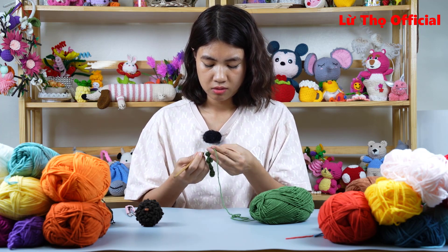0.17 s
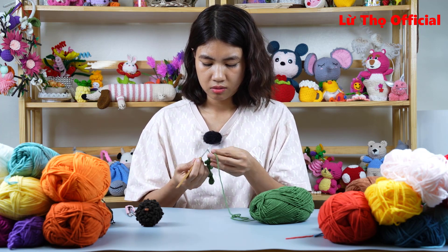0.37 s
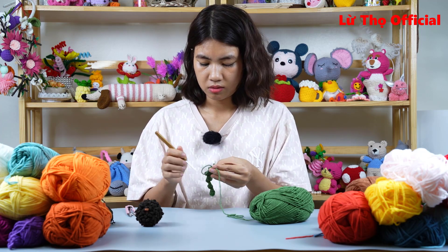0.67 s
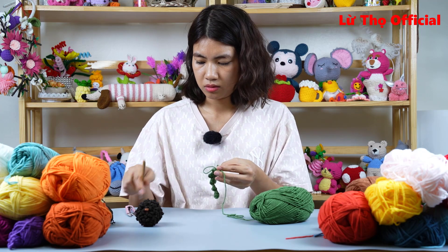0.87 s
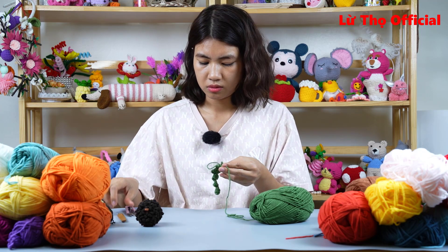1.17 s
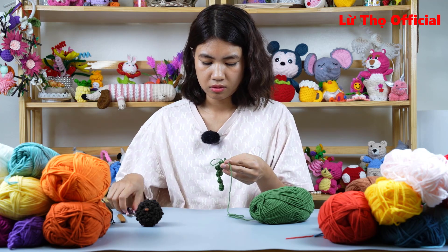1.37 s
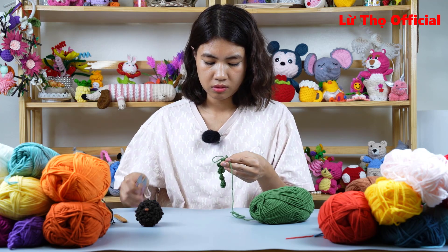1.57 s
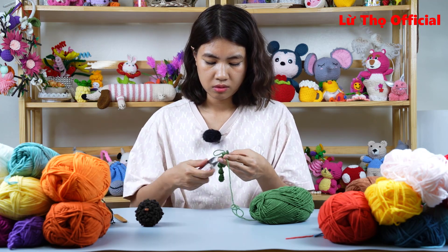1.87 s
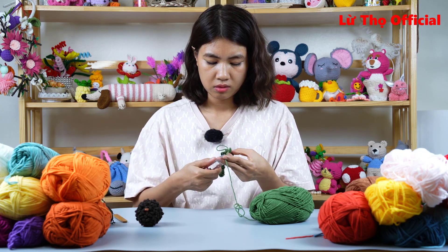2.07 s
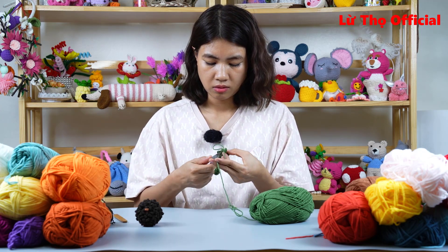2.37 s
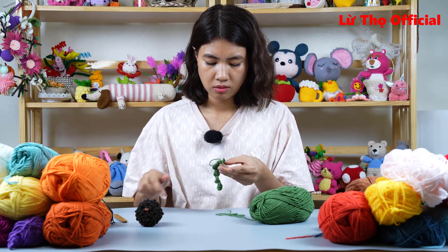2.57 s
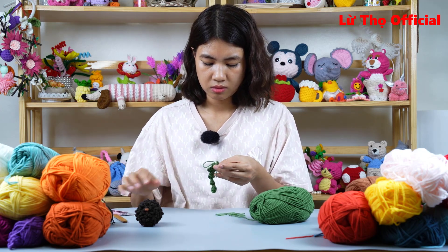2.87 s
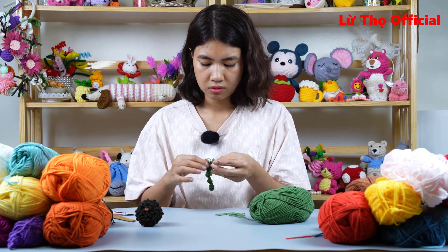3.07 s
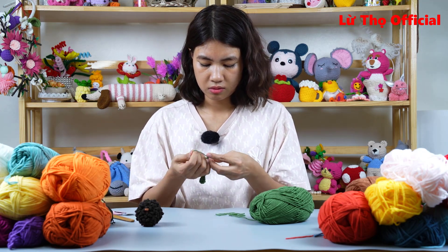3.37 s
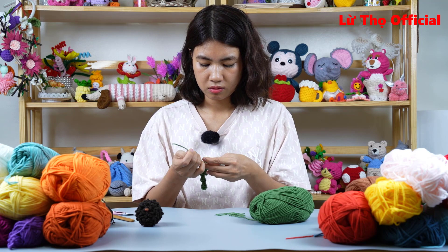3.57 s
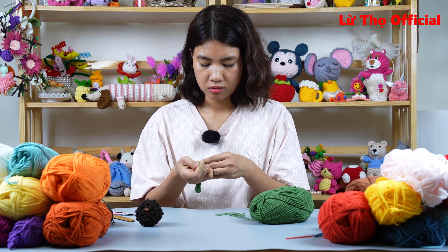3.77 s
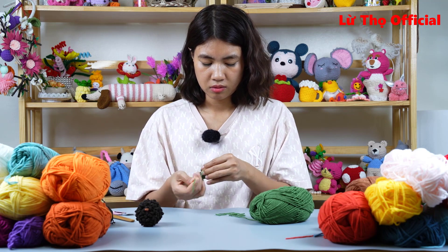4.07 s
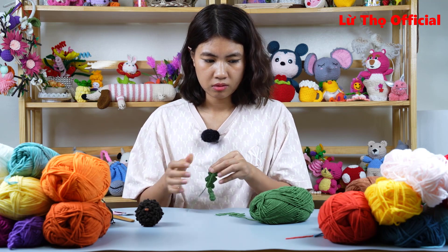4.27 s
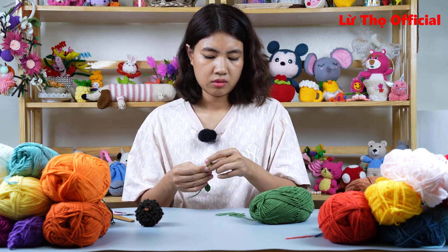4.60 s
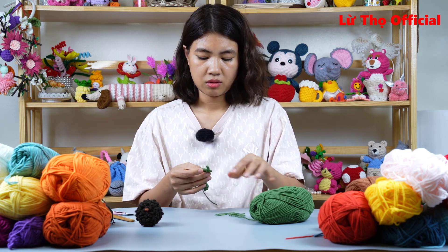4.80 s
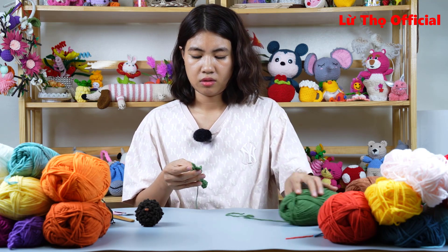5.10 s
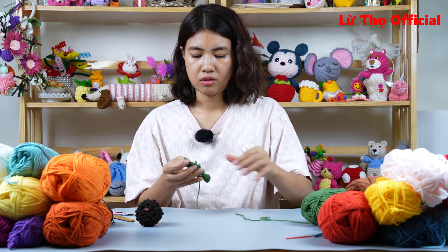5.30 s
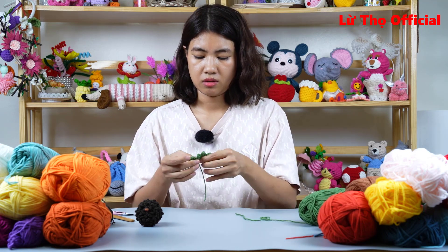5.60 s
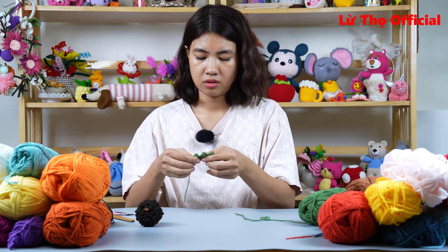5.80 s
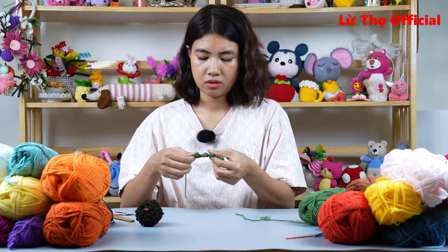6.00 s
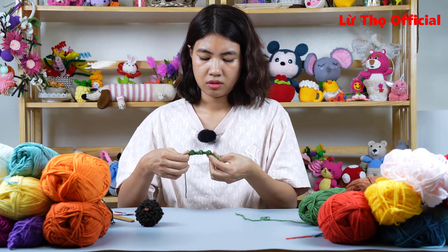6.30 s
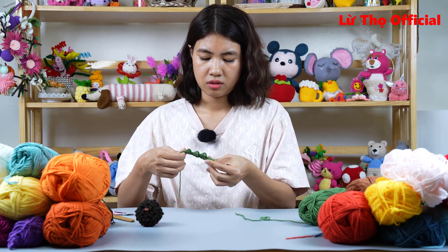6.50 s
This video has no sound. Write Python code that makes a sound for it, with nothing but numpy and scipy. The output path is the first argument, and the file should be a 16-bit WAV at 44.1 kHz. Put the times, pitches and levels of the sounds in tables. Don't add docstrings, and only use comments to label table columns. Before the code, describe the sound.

In a small quiet room, yarn slips with a faint squeak over a metal hook, which then drops on the table with a sharp knock and a rolling rattle. Scissors drag up, scrape open, snip hard, snip again more finely, and clatter down on the wood. Afterwards fingers rub and tug yarn in soft, fuzzy strokes. A close chest microphone adds low room rumble and light hiss.

```python
import sys
import numpy as np
from scipy import signal
from scipy.fft import rfft, irfft
from scipy.io import wavfile
from scipy.ndimage import uniform_filter1d

SR = 44100
rng = np.random.default_rng(int(sys.argv[2]) if len(sys.argv) > 2 else 0)


def master(y):
    cut = np.clip(np.atleast_2d(y).T, -1, 1)
    pcm = np.round(cut * 32767)
    wavfile.write(sys.argv[1], SR, pcm.astype(np.int16))


def voltage_ratio(decibels):
    exponent = np.asarray(decibels, float) / 20
    return 10 ** exponent


N = 293176

# pitch_hz, level_db, t60_s
END_MODES = [(1810, -13, 0.041), (4061, 3, 0.0355), (4220, 0, 0.03), (7630, 0.5, 0.014), (10700, -13, 0.01)]
SIDE_MODES = [(2640, -6.5, 0.0073), (4960, -18, .06), (4990, -2, 0.014), (7600, -22, .04),
              (7850, -3.5, 0.011), (10960, -21, 0.0053)]
LYING_MODES = [(1720, -9, 0.074), (4070, 7.5, 0.034), (7600, 0, .05), (10700, -13, 0.04), (13100, -14, .03)]
# start_s, peak_db, contact_hz, chatter_t60_s, body_ring_db
HOOK_LANDINGS = [
    (1.1415, -32.5, 5400, 0.0055, -20),
    (1.154, -2.5, 3900, 0.0025, -5),
    (1.1543, -11.5, 6000, .005, -32),
    (1.1545, -10, 2650, 0.0058, -28),
    (1.1635, -20, 4500, .003, -32),
]
HOOK_ROLLING = [(1.2222, -4.5, 7350, 0.004, -10), (1.2224, -6.5, 2800, .005, -18),
                (1.228, -16, 3200, 0.014, -19), (1.2226, -12, 5400, .004, -25),
                (1.2355, -6, 3400, 0.0036, -29), (1.2357, -11, 5600, .003, -30),
                (1.2435, -7, 3980, 0.0047, -20), (1.251, -4, 8100, 0.0034, 7.5),
                (1.2512, -7, 3100, .005, -20), (1.274, -26.5, 12000, .003, -22),
                (1.282, -11, 4670, 0.0033, -35), (1.298, -25, 11000, 0.0033, -13),
                (1.171, -29.5, 7500, .003, -20), (1.2135, -20, 2500, .003, -25),
                (1.302, -19, 3000, .003, -25)]
HOOK_TOUCHES = [
    (1.094, -37, 7600, 0.0052, -16),
    (3.002, -7.5, 9500, 0.0049, -8.5),
    (3.0022, -11, 5460, 0.0035, -30),
    (3.137, -17, 9600, 0.01, -4),
    (3.165, -28, 11000, 0.0077, -18),
]


def hook():
    landing = knocks(HOOK_LANDINGS, END_MODES, loose=0.0041, thud_db=2.1, crack_db=-8.0)
    rolling = knocks(HOOK_ROLLING, SIDE_MODES, loose=0.0013, thud_db=-6.5, crack_db=-18.5)
    nudged = knocks(HOOK_TOUCHES, LYING_MODES, loose=0.0044, thud_db=-25, crack_db=-8.0)
    return off_axis(landing + rolling + nudged)


# pitch_hz, level_db, t60_s
HANDLE_MODES = [(1700, 0, .02), (2080, -3, .014), (2500, -3, .012), (2900, 0, .012), (3250, -2, .012),
                (4200, -6, .01), (4550, -7, .008), (5500, -7, .008), (7800, -12, .006)]
# start_s, peak_db, contact_hz, chatter_t60_s, body_ring_db
HANDLES_LIFTED = [(1.422, -24, 1900, 0.004, 8), (1.4222, -26, 4970, .003, -10),
                  (1.429, -28, 4550, 0.0091, 5), (1.441, -21.5, 5560, 0.0034, -12),
                  (1.4412, -25, 3150, 0.0074, 3), (1.489, -32, 6040, .0044, -3),
                  (1.524, -12, 4500, 0.0044, -0.5), (1.5445, -7, 8260, 0.0034, -6),
                  (1.545, -8.5, 5240, 0.0099, -6), (1.5452, -11.5, 3100, .008, -11),
                  (1.574, -37, 10500, .003, -14), (1.608, -23, 1900, 0.0082, -3.5)]
HANDLES_LAID = [(2.856, -13, 2370, 0.0088, 5), (2.868, -25, 2220, .0043, 10.5),
                (2.881, 0, 3480, 0.006, -5.5), (2.8835, -5, 3000, 0.0053, -16),
                (2.893, -10, 2550, 0.0039, -1), (2.909, -23, 6000, .004, 10), (2.923, -30, 7000, .004, -6),
                (2.946, -18, 5030, 0.0035, 3), (2.955, -13.5, 2880, 0.012, 4),
                (2.9575, -10, 2900, 0.0042, -9.5), (2.9595, -7.5, 2860, 0.0085, -5),
                (2.976, -21, 2800, 0.0053, 6), (3.012, -17, 2120, 0.0029, 5),
                (2.8812, -7.5, 6170, 0.0074, -25), (3.061, -20, 3000, 0.0036, 0.5),
                (3.077, -20, 3170, .003, -3)]
FAINT_TICKS = [
    (.433, -31, 4900, .003, -25),
    (.658, -36, 2000, .0024, -20),
    (.669, -25, 5430, .003, -25),
    (2.794, -30, 3800, .004, -20),
    (4.597, -38, 800, .004, -20),
    (4.785, -38, 6000, .003, -20),
    (6.219, -34, 1300, .005, -22),
    (6.2195, -38, 6500, .003, -30),
]


def handles():
    lifted = knocks(HANDLES_LIFTED, HANDLE_MODES, loose=0.033, thud_db=-21.5, favour_db=12.0, crack_db=-12.0)
    laid = knocks(HANDLES_LAID, HANDLE_MODES, loose=0.021, thud_db=-24, favour_db=9.0, crack_db=-19.0)
    ticks = knocks(FAINT_TICKS, HANDLE_MODES, loose=.08, thud_db=-50.5)
    return off_axis(lifted + laid + ticks)


def off_axis(x):
    return signal.sosfilt(signal.butter(2, 13300, fs=SR, output="sos"), x)


# pitch_hz, level_db
TABLE_COLOUR = [(120, -17), (300, -14), (450, -0.5), (800, -0.5), (1700, 1), (3000, -4.5), (5000, -20.5),
                (9000, -44.5)]
# pitch_hz, level_db, t60_s
TABLE_MODES = [(471, -13, 0.15), (552, 0.5, 0.032), (596, -4, 0.023), (832, 2, 0.047), (1047, 10, 0.092),
               (1545, 8, 0.067), (1930, 1, 0.03), (2160, -3, .023), (2980, 8, .018), (3000, -11, 0.035),
               (3480, -3, 0.032)]
TABLE_T60_S = 0.058


def knocks(rows, body, loose, thud_db, favour_db=0, crack_db=-35.0):
    out, t = np.zeros(N), np.arange(4000) / SR
    for start_s, db, hz, t60, body_db in rows:
        chatter, wood = rng.standard_normal((2, len(t)))
        chatter = chatter * voltage_ratio(-60 * t / max(t60, .001))
        chatter[0] = 1.5
        click = band(band(chatter, 0.64 * hz, 1.33 * hz), 0.54 * hz, 1.62 * hz)
        click = click + voltage_ratio(crack_db + 0.43 * db) * band(chatter, 1400, 12000)
        add(out, start_s, voltage_ratio(db) * click / abs(click).max())

        detune = 1 + loose * rng.uniform(-0.38, 1, (len(body), 1))
        add(out, start_s, voltage_ratio(db + body_db) * ring(favoured(body, hz, favour_db), detune))

        rattle = voltage_ratio(-6 - 60 * t / TABLE_T60_S) * evened(colour(wood, TABLE_COLOUR))
        rattle = rattle * (1 - np.exp(-t / .0004))
        top = ring(TABLE_MODES, rng.uniform(.985, 1.015, (len(TABLE_MODES), 1)))[:len(t)]
        add(out, start_s, voltage_ratio(db + thud_db) * (0.53 * rattle + 0.43 * top))
    return out


# pitch_hz, level_db
BLADE_MODES = [(1600, -28.5), (3250, -14.5), (4350, -11.5), (5500, -7), (6250, -10), (6580, -4.5),
               (6950, -5.5), (8800, -24), (9750, -6), (10100, -4.5), (11450, -3.5), (12300, 4), (13100, 6),
               (14900, 3)]
# peak_s, rise_s, fall_s, level_db, favoured_mode_hz
BLADE_BURSTS = [(2.229, 0.0015, .0017, -52, 5500), (2.241, 0.0016, .002, -50, 6600),
                (2.25, 0.004, 0.0042, -35, 11450), (2.252, .005, 0.0045, -34.5, 6700),
                (2.262, 0.00075, 0.00069, -29, 6600), (2.276, 0.00229, 0.0018, -28, 11450),
                (2.2757, 0.0047, 0.0025, -24.5, 6600), (2.322, .013, .01, -57, 11400),
                (2.32, .012, .012, -54, 6700), (2.349, 0.0091, .004, -39, 6600),
                (2.255, .008, .008, -41, 1600), (2.340, .006, 0.0064, -45, 11400),
                (2.35, 0.0059, 0.0033, -33, 11400), (2.3555, 0.0021, 0.0015, -22.5, 11230),
                (2.358, .001, 0.00075, -11, 6580), (2.3598, .001, 0.0016, -10.5, 10480),
                (2.3597, 0.00081, 0.00081, -20.5, 6560), (2.5092, 0.00086, 0.0024, -31.5, 11150),
                (2.5132, 0.0013, 0.0017, -25, 7100), (2.515, 0.0012, 0.0012, -16, 11400),
                (2.517, 0.00084, 0.00082, -15.5, 9900), (2.5193, 0.00049, .0008, -17, 9800),
                (2.519, 0.0009, 0.0015, -26, 5500), (2.521, 0.0068, 0.0051, -24, 12500),
                (2.522, .004, 0.0036, -28, 5500), (2.516, .003, .003, -32, 7000),
                (2.5251, 0.00038, 0.001, -12, 11400), (2.5247, .0006, 0.0011, -16.5, 6440),
                (2.5263, 0.00061, 0.0012, -15.5, 11400), (2.5295, 0.0006, 0.00078, -16, 7000),
                (2.5293, .0005, 0.00037, -13, 13100), (2.528, .0005, 0.00055, -28, 9500),
                (2.535, 0.0008, 0.0018, -38, 7000)]
# start_s, bending_ring_db, pitch_hz, t60_s, thud_db
BLADE_STOPS = [
    (2.251, -26, 2800, 0.012, -45),
    (2.262, -34, 2660, 0.022, -50),
    (2.2769, -9, 3220, 0.012, -21.5),
    (2.3598, 4, 3090, 0.0073, -11),
    (2.512, -30, 3200, 0.012, -48),
    (2.521, -24, 3150, 0.012, -32),
    (2.529, -26, 3100, 0.044, -32),
    (2.535, -25, 3493, 0.03, -62.5),
]
BLADE_CYCLES = 32


def snips():
    out = np.zeros(N)
    swing_in = 1 - np.exp(-np.arange(SR // 10) / SR / .0005)
    modes = [(hz, own_db, BLADE_CYCLES / hz) for hz, own_db in BLADE_MODES]
    for peak_s, rise, fall, db, near_hz in BLADE_BURSTS:
        t = np.arange(-rise, 2 * fall, 1 / SR)
        swell = np.where(t < 0, (1 + t / rise) ** 2, np.exp(-(t / fall) ** 2 * 2))
        burst = grit(SR // 20, 2.2)[:len(t)] * swell
        detune = rng.uniform(.99, 1.01, (len(modes), 1))
        blades = signal.oaconvolve(burst, ring(favoured(modes, near_hz, 17.5), detune) * swing_in)
        blades /= np.sqrt(np.mean(blades[:len(t)] ** 2))
        scrape = 0.2 * evened(band(burst, 9000, 16400)) + 0.0985 * evened(band(burst, 1610, 5240))
        add(blades, 0, scrape)
        add(out, peak_s - rise, voltage_ratio(db) * blades)
    out = signal.sosfilt(signal.butter(2, 1290, "high", fs=SR, output="sos"), out)

    t = np.arange(2000) / SR
    for start_s, db, hz, t60, thud_db in BLADE_STOPS:
        bend = ring([(hz, 0, t60), (.95 * hz, -4, 1.5 * t60)])[:len(t)] * (1 - np.exp(-t / .0006))
        thud = np.sin(2 * np.pi * 650 * t) * np.exp(-t / 0.001)
        add(out, start_s, voltage_ratio(db) * bend)
        add(out, start_s, voltage_ratio(thud_db) * thud)
    return out


# middle_s, length_s, level_db, resonance_hz, bright_share (0-1)
TABLE_SLIDES = [(1.198, 0.027, -22, 1050, 0.76), (1.199, 0.011, -18, 5700, 0.2),
                (1.496, 0.007, -33, 4080, 0.2), (1.5633, 0.0057, -23, 2770, 0.27),
                (1.564, .006, -33, 3850, .2), (1.514, .014, -32, 3174, 0.1),
                (1.55, 0.0215, -32.5, 3123, 0.1), (1.596, 0.0065, -33, 2900, .4),
                (1.298, 0.26, -30.5, 1110, 0.43), (1.449, 0.04, -32.5, 2050, 0.37),
                (1.497, 0.035, -30.5, 1800, 0.55), (1.524, 0.02, -28.5, 2090, 0.2),
                (1.548, 0.043, -25, 1900, 0.26), (1.61, 0.013, -26, 1830, 0),
                (1.624, 0.0077, -37.5, 1740, 0), (1.633, 0.011, -25, 1680, 0.14),
                (1.618, 0.08, -37, 4770, 0.73), (1.69, 0.072, -54, 1710, 0.3),
                (1.508, 0.048, -36, 5300, 0.45), (2.865, 0.015, -18, 1860, 0.31),
                (2.9, 0.01, -23, 1930, 0.4), (2.961, 0.026, -22, 1780, 0.44),
                (3.017, 0.018, -26, 1780, 0.47)]


def slides():
    out, rough = np.zeros(N), grit(N, 2.4)
    scratch_hz = 4500
    for middle_s, length, db, hz, bright in TABLE_SLIDES:
        start_s, catch, swell = stroke(rough, middle_s, length, 3.7)
        bright = np.clip(bright, 0, 1)
        lower = resonate(resonate(catch, hz, 370), hz, 450)
        upper = resonate(resonate(catch, 1.5 * hz, 410), 1.33 * hz, 540)
        hollow = evened(lower + 900 / hz * upper + 0.263 * band(catch, 5370, 5500))
        scratch = band(catch, 0.43 * scratch_hz, 0.96 * scratch_hz) + 0.99 * band(catch, 450, 3800)
        add(out, start_s, voltage_ratio(db) * swell * (bright * evened(scratch) + (1 - bright) * hollow))
    return out


# pitch_hz, level_db
FUZZ_COLOUR = [(1700, -20), (2400, -4.5), (3200, -1), (10000, -3.5), (13000, -8), (16000, -8)]
# middle_s, length_s, level_db, centre_hz, airy_top_db (re level)
YARN_PULLS = [
    (.004, 0.02, -36.5, 4970, -4.5),
    (0.268, 0.1, -50.5, 5020, -16),
    (0.475, 0.087, -36.5, 4900, -5),
    (0.509, 0.074, -38, 8750, 0),
    (0.531, 0.062, -43, 4000, -15),
    (1.81, 0.031, -53, 5300, -15),
    (1.948, 0.0084, -48, 6300, -17),
    (1.9, 0.37, -58, 5400, -21),
]
YARN_RUBS = [(3.179, 0.042, -40.5, 4500, 1), (3.26, 0.088, -39, 6140, -5), (3.38, 0.083, -44.5, 5000, -9),
             (3.498, 0.081, -36.5, 5260, -6), (3.68, 0.19, -48.5, 6250, -13),
             (3.79, 0.05, -48.5, 5550, -12), (3.98, 0.055, -50.5, 6600, -2), (4.2, 0.054, -41.5, 5420, -5),
             (4.52, 0.099, -49.5, 6000, -9), (4.676, 0.092, -37.5, 5680, -26.5),
             (4.76, 0.063, -46.5, 6470, -1), (5.17, 0.27, -48.5, 5000, -35.5),
             (5.316, 0.048, -40, 6800, -6), (5.49, 0.36, -57, 5300, -7.5), (5.275, 0.029, -53, 4800, -20),
             (5.5, 0.026, -48, 4800, -15), (5.655, 0.061, -47.5, 5800, -16), (5.78, 0.049, -44, 6480, -16),
             (5.85, 0.082, -48.5, 6300, -6), (5.979, 0.11, -41, 6430, -10),
             (6.128, 0.096, -48.5, 5700, -11), (6.299, 0.099, -34, 6470, -12.5),
             (6.364, 0.078, -36.5, 5200, -21.5), (6.585, 0.16, -42.5, 6600, -25),
             (5.7, 1.3, -53.5, 6000, -17)]
# middle_s, length_s, level_db
SOFT_BRUSHES = [
    (.004, 0.014, -39),
    (0.473, 0.083, -36),
    (.53, 0.032, -47),
    (3.484, .05, -41),
    (4.6, 0.4, -53),
    (5.122, 0.13, -41.5),
    (5.298, 0.25, -42.5),
    (6.303, 0.13, -65),
]
# middle_s, length_s, level_db, pitch_hz
HOOK_SQUEAKS = [
    (.004, 0.015, -40, 4750),
    (0.292, 0.12, -57.5, 5000),
    (0.437, 0.015, -41.5, 4900),
    (.452, 0.01, -29.5, 4980),
    (0.472, 0.02, -30.5, 4870),
    (0.536, 0.043, -38, 4930),
    (0.678, 0.0093, -51.5, 4940),
]
RUB_EDGE = 2.86


def yarn():
    out = np.zeros(N)
    fibres = patchy(colour(grit(N, 0.99), FUZZ_COLOUR), 2)
    for middle_s, length, db, hz, top_db in YARN_PULLS + YARN_RUBS:
        start_s, fuzz, swell = stroke(fibres, middle_s, length, RUB_EDGE)
        core = evened(band(fuzz, 1800, 9000) + 5.5 * resonate(fuzz, hz, 2600))
        airy = voltage_ratio(top_db) * evened(band(fuzz, 5800, 17000))
        add(out, start_s, voltage_ratio(db - 4.5) * swell * (core + airy))

    cloth = evened(resonate(resonate(grit(N, 0.72), 1650, 2400), 1350, 2900))
    for middle_s, length, db in SOFT_BRUSHES:
        start_s, brush, swell = stroke(cloth, middle_s, length, RUB_EDGE)
        add(out, start_s, voltage_ratio(db - 10.5) * swell * brush)

    taut = grit(SR, 3.0)
    for middle_s, length, db, hz in HOOK_SQUEAKS:
        start_s, slip, swell = stroke(taut, middle_s, length, RUB_EDGE)
        squeak = evened(resonate(resonate(slip, hz, 450), hz, 630))
        add(out, start_s, voltage_ratio(db - 1.5) * swell * squeak)
    return out


# start_s, level_db, pitch_hz
SOFT_PATS = [(1.6, -42, 360), (3.1, -31, 330), (2.882, -19.5, 123), (3.469, -25, 248), (3.3, -44, 150),
             (2.7, -31, 84), (1.6, -22, 330), (2, -32.5, 400), (5, -44, 500), (6.219, -31, 310),
             (.668, -32.5, 320), (2.7, -36, 300), (1.722, -37, 250)]


def pats():
    out, t = np.zeros(N), np.arange(5000) / SR
    for start_s, db, hz in SOFT_PATS:
        push = np.sin(2 * np.pi * hz * t) * np.exp(-t * hz * 1.07)
        brush = evened(resonate(rng.standard_normal(len(t)), 1.5 * hz, 365)) * np.exp(-t / 0.029)
        add(out, start_s, voltage_ratio(db) * (push + 0.091 * brush))
    return out


# pitch_hz, t60_s
ROOM_DECAY = [(200, 1), (1000, 0.95), (3000, 0.51), (7000, 0.51), (12000, 0.44), (16000, 0.67)]


def room(x):
    taps = np.zeros(SR // 2)
    at = np.arange(150, SR // 2 - 20, 20)
    taps[at + rng.integers(0, 20, len(at))] = rng.choice([-1., 1.], len(at))
    hz, t, z = signal.stft(taps, SR, nperseg=256)
    decay = voltage_ratio(-60 * t / read(ROOM_DECAY, hz)[:, None])
    tail = signal.istft(z * decay, SR, nperseg=256)[1]
    return signal.fftconvolve(x, tail / np.linalg.norm(tail))[:N]


# pitch_hz, level_db (per Hz)
ROOM_HUM = [(20, -44), (128, 2.5), (330, -4.5), (520, -11), (600, -13), (1840, -23.5), (7000, -27),
            (15900, -31.5)]
# pitch_hz, level_db (rms)
MOTOR_TONES = [(500.6, -62.5), (1001, -70)]


def hum():
    frames, hz = N // 256 + 5, np.fft.rfftfreq(1024, 1 / SR)
    a, b, patches = rng.standard_normal((frames, 513, 3)).T
    patches = evened(uniform_filter1d(uniform_filter1d(patches, size=6, axis=0), size=8, axis=1))
    level_db = read(ROOM_HUM, hz)[:, None] + 2.5 * patches / (1 + hz[:, None] / 600)
    z = (a + 1j * b) * voltage_ratio(level_db) * (hz[:, None] < 15700)
    noise = evened(signal.istft(z, nperseg=1024, noverlap=768)[1][:N])

    t = np.arange(N) / SR
    waver = 1 + .3 * evened(uniform_filter1d(rng.standard_normal(N), size=6000))
    tones = waver * sum(voltage_ratio(db + 3) * np.sin(2 * np.pi * f * t) for f, db in MOTOR_TONES)
    return tones + voltage_ratio(-45) * noise


# pitch_hz, level_db (per Hz)
SIDE_HISS = [(18, -17), (30, 0), (82, 3), (378, -2), (978, -3.5), (6200, -3), (15400, -5), (15700, -45)]


def side_hiss():
    hiss = voltage_ratio(-65) * evened(colour(rng.standard_normal(N), SIDE_HISS))
    return hiss * np.array([[1], [-1]])


def evened(x):
    return x / np.sqrt(np.mean(x ** 2) + 1e-20)


def read(points, hz):
    f, value = np.transpose(points)
    return np.interp(np.log(hz + 1), np.log(f + 1), value)


def add(mix, start_s, sound):
    part = mix[round(start_s * SR):][:len(sound)]
    part += sound[:len(part)]


def colour(x, points):
    return irfft(rfft(x) * voltage_ratio(read(points, np.fft.rfftfreq(len(x), 1 / SR))), len(x))


def band(x, lo_hz, hi_hz):
    edges = [lo_hz, min(hi_hz, .45 * SR)]
    return signal.sosfilt(signal.butter(2, edges, "band", fs=SR, output="sos"), x)


def resonate(x, hz, width):
    turn = np.exp(2j * np.pi * np.cumsum(hz * np.ones(len(x))) / SR)
    r = np.exp(-np.pi * width / SR)
    return 2 * (turn * signal.lfilter([1 - r], [1, -r], x / turn + 1e-18)).real


def ring(modes, detune=0.96):
    hz, db, t60 = np.transpose(modes)[:, :, None]
    t = np.arange(SR // 10) / SR
    sound = (voltage_ratio(db - 60 * t / t60) * np.sin(2 * np.pi * hz * detune * t)).sum(0)
    return sound / abs(sound).max()


def favoured(modes, near_hz, favour_db):
    def lift(hz):
        return favour_db * np.exp(-(np.log2(hz / near_hz) / 0.069) ** 2)
    return [(hz, db + lift(hz), t60) for hz, db, t60 in modes]


def grit(count, spread_db):
    grains = evened(uniform_filter1d(rng.standard_normal(count), size=40))
    return evened(rng.standard_normal(count) * voltage_ratio(spread_db * grains))


def stroke(noise, middle_s, length, edge):
    start = max(round((middle_s - length) * SR), 0)
    part = noise[start:round((middle_s + length) * SR)]
    place = 2 / length * ((start + np.arange(len(part))) / SR - middle_s)
    return start / SR, part, np.exp(-abs(place) ** np.where(place > 0, 0.62 * edge, edge))


def patchy(x, spread_db):
    z = signal.stft(x, nperseg=256)[2]
    patches = uniform_filter1d(rng.standard_normal(z.shape), size=6, axis=0)
    patches = evened(uniform_filter1d(patches, size=6, axis=1))
    return evened(signal.istft(z * voltage_ratio(spread_db * patches), nperseg=256)[1][:len(x)])


# pitch_hz, level_db
BLADE_BEAM = [(600, -8), (2900, 2), (4500, 3), (6700, 0), (8300, 1.5), (10200, -5.5), (13500, -5),
              (16000, 0)]


def scene():
    hook_sound, handle_sound = hook(), handles()
    blades, drag = snips(), slides()
    sent = band(voltage_ratio(-8.0) * hook_sound + voltage_ratio(-10.0) * handle_sound, 180, 9700)
    sent = sent + voltage_ratio(-16.0) * drag + voltage_ratio(-17.5) * colour(blades, BLADE_BEAM)
    near = hook_sound + handle_sound + drag + blades + yarn() + room(sent) + pats()
    mono = band(near, 156.6, 14300) + hum()
    return np.array([mono, mono])


def band_limit(x):
    return signal.sosfilt(signal.butter(12, 16620, fs=SR, output="sos"), x)


def record(dry):
    full = np.clip(dry + side_hiss(), -.86, .86)
    low_pass = signal.firwin(255, 16400, window=("kaiser", 8), fs=SR)
    edged = signal.oaconvolve(full, low_pass[None], "same")
    return band_limit(edged)


dry = scene()
out = record(dry)
master(out)
```